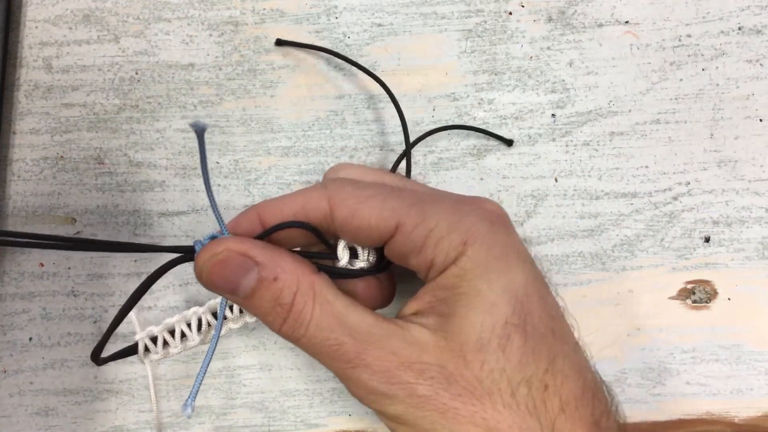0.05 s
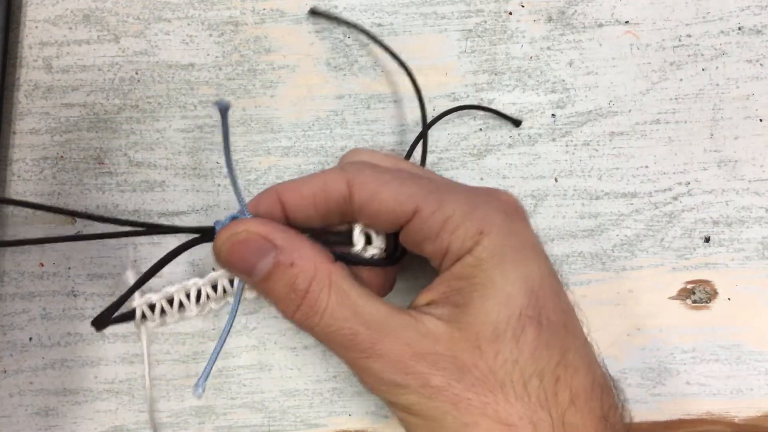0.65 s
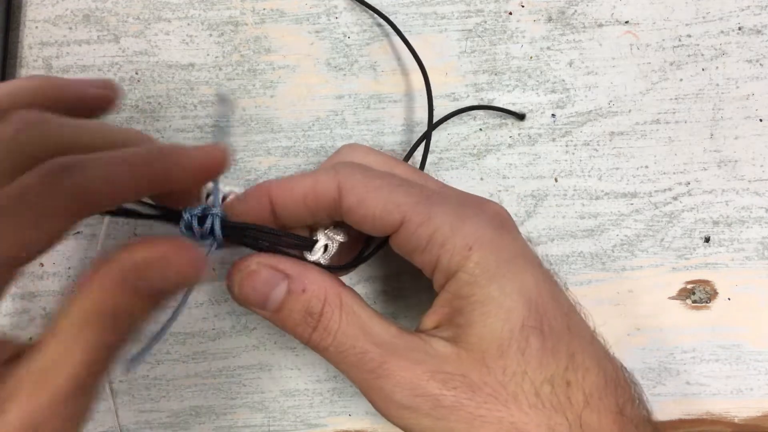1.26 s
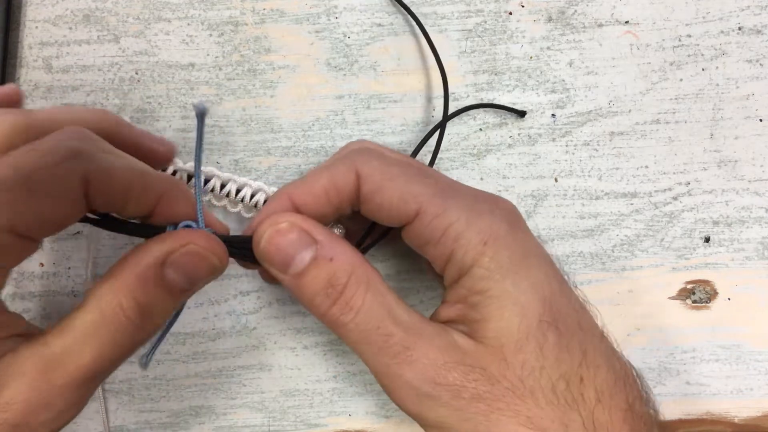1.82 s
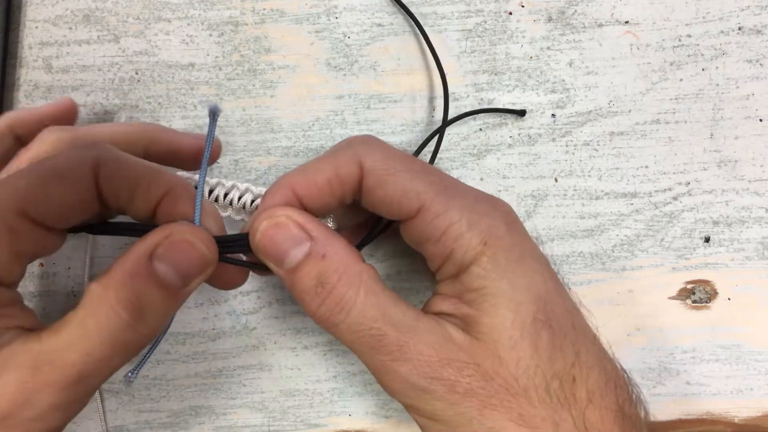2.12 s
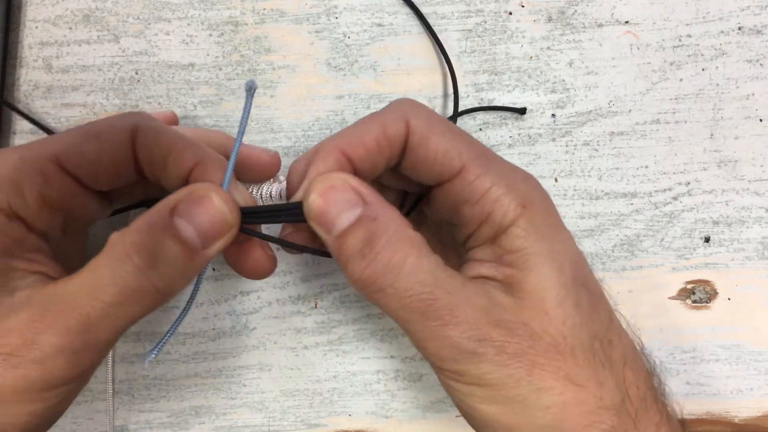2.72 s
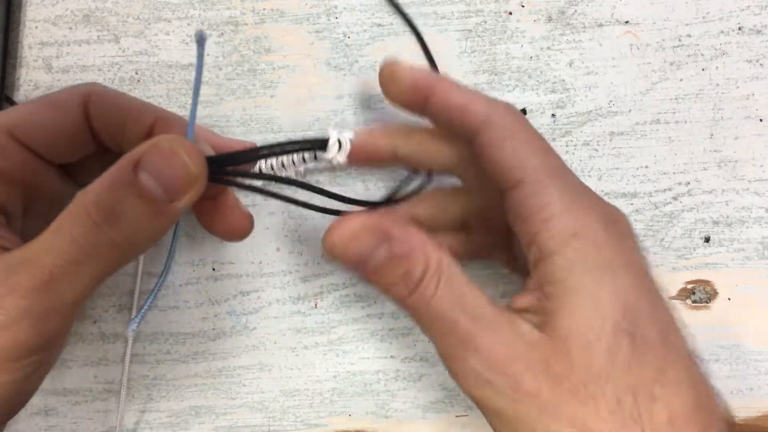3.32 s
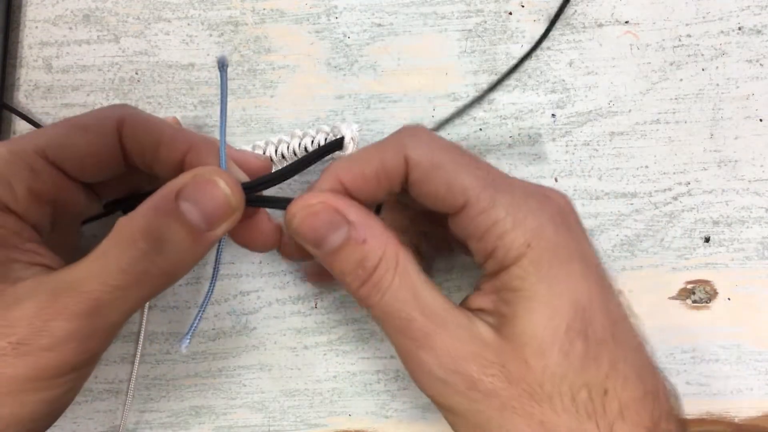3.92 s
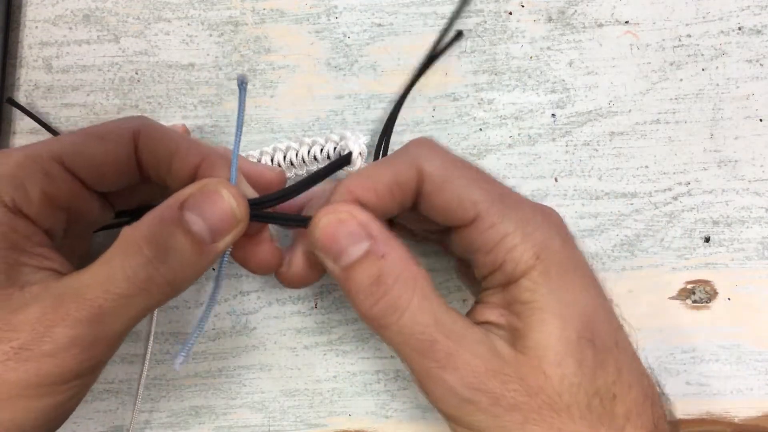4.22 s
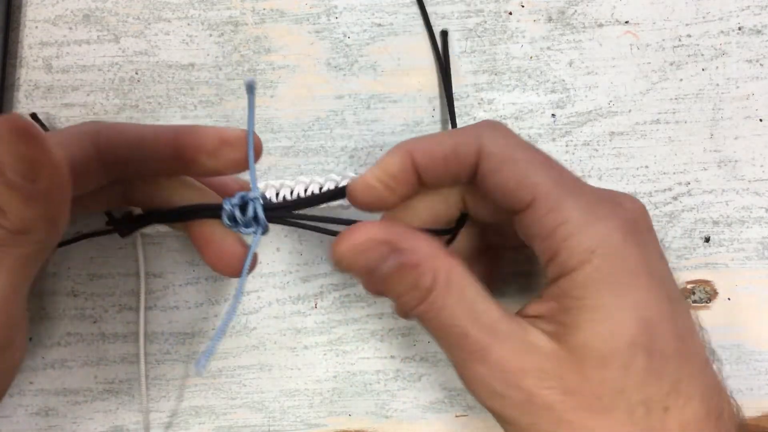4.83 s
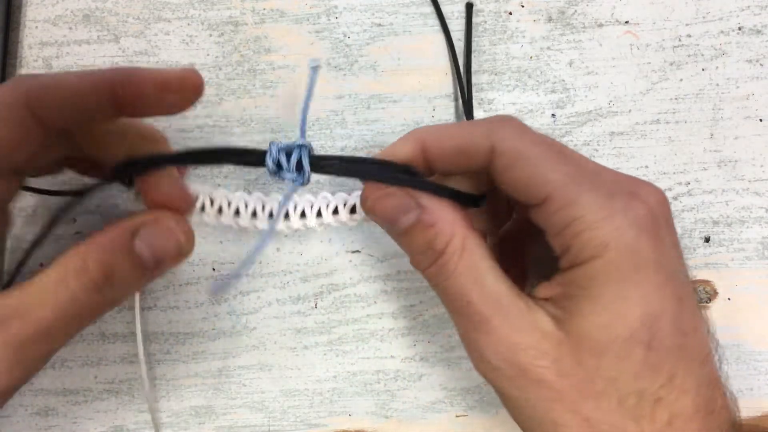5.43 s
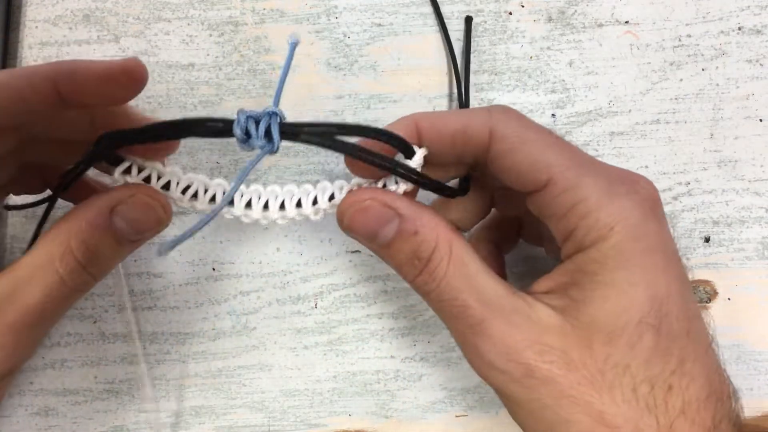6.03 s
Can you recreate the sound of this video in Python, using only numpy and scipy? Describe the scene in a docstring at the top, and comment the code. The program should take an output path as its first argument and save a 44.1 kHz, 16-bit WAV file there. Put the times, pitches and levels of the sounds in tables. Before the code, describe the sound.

Hands adjust the sliding knot of a braided nylon bracelet, heard close up in a small room. The cord gives a short zip, then its stiff ends tick lightly on a wooden table. Dull fingertip rubs and faint grainy swishes gather in the middle, followed by a second zip and a few more ticks. Tiny fibre snags are scattered throughout, all quiet over a steady low hum and thin hiss.

```python
"""A braided nylon cord rubs through the fingers as hands adjust a bracelet's sliding knot, close up.
Twice it zips, the ribs of its braid dragged over an edge. Fingertips grip with a dull rub, fibres snag
and snap free, and the stiff cord ends tick on a wooden table and set it ringing.
Under it all lies a bed of steady mains hum and the rumble and hiss of a small room."""
import sys
import numpy as np
from scipy import signal
from scipy.fft import rfft, irfft, next_fast_len
from scipy.io import wavfile

SR = 44100
rng = np.random.default_rng(int(sys.argv[2]) if len(sys.argv) > 2 else 0)


def dump_mix(stems):
    """Bounce the given channels to the path in sys.argv[1] as a 16-bit WAV at rate SR."""
    frames = np.atleast_2d(stems).T  # one column per channel
    limited = np.clip(frames, -1, 1)  # hard clip at full scale
    pcm = np.round(limited * 32767).astype(np.int16)
    wavfile.write(sys.argv[1], SR, pcm)


N = 267378


def gain_of(db):
    """Decibels to amplitude."""
    return 10 ** (np.asarray(db) / 20)


def unit_rms(x):
    """Scales to an rms of one."""
    return x / np.sqrt(np.mean(x ** 2) + 1e-20)


def add(mix, start_s, sound):
    """Lays a sound into the mix at its cue."""
    part = mix[max(round(start_s * SR), 0):][:len(sound)]
    part += sound[:len(part)]


def equalised(x, curve, tilt_db=0):
    """Shapes x with an EQ curve, a tilt per octave and a 24 dB per octave low cut, at an rms of one."""
    size = next_fast_len(len(x))
    octave = np.log2(np.fft.rfftfreq(size, 1 / SR) + 1)
    hz, db = np.transpose(curve)
    corners = np.log2(hz + 1)
    low_cut_db = 24 * np.maximum(corners[0] - octave, 0)
    shape = gain_of(np.interp(octave, corners, db + tilt_db * corners) - low_cut_db)
    return unit_rms(irfft(rfft(x, size) * shape, size)[:len(x)])


# EQ of the room's low rumble: (frequency [Hz], level [dB])
RUMBLE_EQ = [(25, -46), (40, -16), (48, -20), (63, -1.5), (78, -4), (102, 0), (114, -0.5), (142, 3),
             (158, -8), (225, -7), (300, -16), (400, -23), (520, -32.5), (900, -66.5)]
# EQ of the room's airy hiss: (frequency [Hz], level [dB])
HISS_EQ = [(480, -3.5), (680, 1.5), (900, -7.5), (1050, -7), (1240, -5.5), (1450, -12), (2100, -14.5),
           (3400, -20), (4600, -18), (7600, -25.5), (8500, -23.5), (11000, -23), (13300, -19.5),
           (15700, -22.5)]


def room_tone(hum_hz=120.3, hum_db=-47.5, rumble_db=-55, hiss_db=-73.5):
    """The bed: mains hum over low rumble and thin hiss."""
    t = np.arange(N) / SR
    hum = gain_of(hum_db) * np.sqrt(2) * np.sin(2 * np.pi * (hum_hz * t + rng.random()))
    rumble = gain_of(rumble_db) * equalised(rng.standard_normal(N), RUMBLE_EQ)
    hiss = gain_of(hiss_db) * equalised(rng.standard_normal(N), HISS_EQ)
    return hum + rumble + hiss


def room_reverb(x, t60=0.3, predelay_s=0.0027):
    """The short, soft tail of a small room."""
    t = np.arange(SR // 3) / SR
    tail = rng.standard_normal(len(t)) * gain_of(-60 * t / t60) * (t > predelay_s)
    return signal.fftconvolve(x, tail / np.linalg.norm(tail))[:N]


def cupped_hands(x, echoes=6):
    """Adds early reflections off the hands and the things around them."""
    response = np.zeros(SR // 50)
    response[rng.integers(SR // 1000, SR // 60, echoes)] = .17 * rng.choice([-1, 1], echoes)
    response[0] = 1
    return signal.fftconvolve(x, response / np.linalg.norm(response))[:N]


def table_echo(x, delay_s, gain):
    """The bounce off the table top comb-filters the sound; comes out at an rms of one."""
    hz = np.fft.rfftfreq(len(x), 1 / SR)
    comb = 1 + gain * np.exp(-2j * np.pi * hz * delay_s)
    return unit_rms(irfft(rfft(x) * comb, len(x)))


# EQ of rubbed nylon: (frequency [Hz], level [dB])
NYLON_EQ = [(500, -53), (900, -4), (1500, -3), (2050, 0), (2650, -2.5), (3300, -2), (4200, 1.5),
            (5200, -1.5), (5950, -1.5), (6600, -2), (7700, -9.5), (8400, -6), (12700, -6), (16000, -16)]


def nylon_scratch(count, centre_hz, focus_db):
    """Nylon-coloured noise, rolled off by focus_db at one octave either side of a centre."""
    curve = [(hz, db - focus_db * np.log2(hz / centre_hz) ** 2) for hz, db in NYLON_EQ]
    return equalised(rng.standard_normal(count), curve)


def faint_snag_cues(first_s=.2, last_s=5.5, per_s=1.5, db=-78.5, spread_db=3, centre_hz=6500):
    """Random cues for small fibres catching in the braid while the hands work."""
    span_s = last_s - first_s
    draws = rng.random((round(per_s * span_s), 2))
    return [(first_s + when * span_s, db + spread_db * (2 * size - 1), centre_hz) for when, size in draws]


# fibres catching and snapping free: (time [s], level [dB], tone centre [Hz])
SNAG_CUES = [(0.349, -66.5, 10300), (.882, -73.5, 10300), (1.088, -67, 8100), (1.732, -76, 6040),
             (2.164, -72.5, 11900), (2.63, -70.5, 7000), (4.103, -75, 6200), (5.131, -73, 6500)]


def fibre_snag(time_s, db, centre_hz, attack_s=0.00048, decay_s=0.0059):
    """A fibre lets go with a short, dry scratch."""
    t = np.arange(SR // 10) / SR
    envelope = (1 - np.exp(-t / attack_s)) * np.exp(-t / decay_s)
    scratch = nylon_scratch(len(t), centre_hz, focus_db=12)
    return time_s, gain_of(db) * envelope / envelope.max() * scratch


# modes of the wooden table top: (frequency [Hz])
WOOD_HZ = [754, 1281, 1658, 2222, 2946, 3560, 4037, 4552, 5089, 5550, 5920, 6850, 12800, 14200]
# how each of those modes rings: (level [dB], time to fall 60 dB [s])
WOOD_RING = [(-15, 0.082), (-10, 0.11), (-10, 0.086), (-15, 0.18), (-2, 0.038), (-9.5, 0.029), (-20, 0.14),
             (-16, 0.18), (-14, 0.051), (-7.5, 0.048), (-12, 0.038), (-3.5, 0.027), (-4.5, 0.03),
             (-11, 0.039)]


def through_wood(rub, share):
    """Where the cord touches the table, a share of the rub's power sounds through the wood's modes."""
    t = np.arange(SR // 3) / SR
    modes = sum(gain_of(db - 60 * t / t60) * np.sin(2 * np.pi * hz * t)
                for hz, (db, t60) in zip(WOOD_HZ, WOOD_RING))
    ring = signal.fftconvolve(rub, modes)[:len(rub)]
    return np.sqrt(1 - share) * rub + np.sqrt(share) * rub.std() * unit_rms(ring)


# stiff cord ends ticking on the table: (time [s], level [dB], tone centre [Hz])
TAP_CUES = [(1.0616, -67.5, 2500), (1.090, -62, 2980), (2.274, -69.5, 2900), (2.3355, -52, 5160),
            (4.665, -59.5, 2120), (5.343, -63.5, 3000), (5.4, -64.5, 2700), (5.5232, -63, 2030)]


def cord_end_tap(time_s, db, centre_hz, attack_s=0.0007, crack_decay_s=0.0088, knock_t60=0.11):
    """A cord end strikes the wood: a brief crack and a dull knock, then the table's modes die away."""
    t = np.arange(SR // 3) / SR
    ring = np.zeros(len(t))
    for hz, (mode_db, t60) in zip(WOOD_HZ, WOOD_RING):
        struck_db = mode_db - np.log2(hz / centre_hz) ** 2  # 1 dB down an octave off centre
        ring += gain_of(struck_db - 60 * t / t60) * np.sin(2 * np.pi * (hz * t + rng.random()))
    knock = gain_of(-60 * t / knock_t60) * np.sin(2 * np.pi * WOOD_HZ[0] * t)
    crack = np.exp(-t / crack_decay_s) * nylon_scratch(len(t), centre_hz, focus_db=8)
    layers = gain_of(-3) * ring + gain_of(-4.5) * crack + gain_of(-10.5) * knock
    return time_s, gain_of(db) * (1 - np.exp(-t / attack_s)) * layers


def friction(peak_s, length_s, db, curve, tilt_db, grain_db, flutter_db, flutter_hz):
    """A swarm of tiny slips of unequal size that swells and fades with the hand's speed."""
    t = np.arange(2 * SR) / SR - 1  # one second either side of the peak
    ramp_s = length_s * np.where(t < 0, .46, .54)  # the swell is a little quicker than the fade
    speed = np.exp(-(t / ramp_s) ** 2)
    slips = rng.standard_normal(len(t))
    slips *= gain_of(grain_db * np.minimum(rng.exponential(1, len(t)), 5))
    flutter = np.interp((t + 1) * flutter_hz, np.arange(1024), rng.standard_normal(1024))
    pressure = unit_rms(gain_of(flutter_db * flutter))
    rub = table_echo(equalised(slips, curve, tilt_db), delay_s=.00061, gain=.22)
    stroke = gain_of(db) * speed * pressure * rub
    return max(peak_s - 1, 0), stroke[peak_s + t >= 0]


# EQ of dragging skin: (frequency [Hz], level [dB])
SKIN_EQ = [(90, -14), (170, 5.5), (290, 0.5), (380, 6), (510, -16), (620, -3.5), (760, -6.5), (980, -18),
           (1270, -12), (1500, -23.5), (1750, -24.5), (3000, -37)]
# fingertips gripping the taut cord: (peak time [s], length [s], level [dB])
GRIP_CUES = [(1.348, .09, -66), (2.527, 0.08, -61), (2.692, 0.16, -62), (2.808, 0.098, -58.5),
             (2.912, 0.065, -58), (2.992, 0.11, -57), (3.183, 0.1, -67.5), (3.495, 0.06, -66.5),
             (3.911, 0.1, -63.5), (4.102, 0.054, -59.5), (4.168, 0.024, -60.5), (4.958, 0.045, -61)]


def finger_grip(peak_s, length_s, db):
    """Skin drags on the taut cord with a dull rub, and the squeezed braid rustles faintly."""
    start_s, skin = friction(peak_s, length_s, db, SKIN_EQ, tilt_db=0,
                             grain_db=2.5, flutter_db=1, flutter_hz=120)
    _, rustle = cord_slide(peak_s, length_s, db - 20, tilt_db=0)
    return start_s, skin + rustle


# cord sliding between the fingers or along the table:
# (peak time [s], length [s], level [dB], brightness [dB/octave], share through the wood [0-1])
SLIDE_CUES = [ (0.536, .016, -68, 10, 0), (1.121, 0.18, -78, -2.5, .4), (1.328, 0.12, -78.5, -3.5, 0.05),
              (2.318, 0.068, -73, 3.5, 0.8), (2.409, 0.075, -75, 4.5, 0.3), (2.547, 0.11, -71, 0, 0.17),
              (2.679, 0.1, -70, 3, 0.06), (3.18, 0.068, -64, 2.5, 0), (3.232, 0.097, -70, -1.5, 0),
              (3.371, 0.16, -69.5, 1, 0), (3.512, 0.2, -74, -6.5, 0), (3.966, 0.43, -77, -5.5, 0),
              (4.604, 0.14, -72, -0.5, 0.04), (4.669, 0.096, -76, 0, 0.1), (4.901, 1, -81, -2.5, 0),
              (5.344, 0.08, -73, -1.5, 0.1), (5.408, 0.14, -78, -2, 0.14), ]


def cord_slide(peak_s, length_s, db, tilt_db):
    """Nylon runs over skin, wood or itself with a grainy swish."""
    return friction(peak_s, length_s, db, NYLON_EQ, tilt_db, grain_db=3, flutter_db=3.5, flutter_hz=260)


# EQ of one rib's scrape: (frequency [Hz], level [dB])
RIB_EQ = [(1000, -26), (2300, -15), (3000, -5), (4000, -7), (5200, -4), (7000, -6), (7900, -10), (8800, -4),
          (9600, 1), (11000, -1), (12000, 1), (13500, -3), (14800, -3), (16000, -8)]
# the braid dragged over an edge: (start [s], peak time [s], end [s], top speed [ribs/s],
# level at top speed [dB], brightness [dB/octave], table echo delay [s])
ZIP_CUES = [(.545, .603, .620, 278, -58, 3.4, .000494), (4.277, 4.3228, 4.364, 172, -60.4, -.4, .000394)]


def braid_zip(start_s, peak_s, end_s, top_speed, db, tilt_db, echo_s, stick_speed=70, puff_s=.0012):
    """Each rib scrapes over the edge in a puff; the puffs crowd and swell, then slow until it sticks."""
    t = np.arange(start_s, end_s, 1 / SR)
    stick_octaves = np.log2(stick_speed / top_speed)
    octaves = np.interp(t, [start_s, peak_s, end_s], [stick_octaves, 0, stick_octaves])
    speed = top_speed * 2 ** octaves
    ribs = np.cumsum(speed) / SR
    ribs -= np.interp(peak_s, t, ribs)  # one rib lands right on the peak
    from_rib_s = abs((ribs + .5) % 1 - .5) / speed
    puffs = unit_rms(.11 + 1 / (1 + (from_rib_s / puff_s) ** 2))  # a little scrape stays between ribs
    scrape = table_echo(equalised(rng.standard_normal(len(t)), RIB_EQ, tilt_db), echo_s, gain=.25)
    swell = gain_of(db + 4.5 * octaves)  # 4.5 dB louder with each doubling of speed
    return start_s, swell * puffs * scrape


def scene():
    """The mono mix: close handling, a touch of reverb and the room bed."""
    rubbing = np.zeros(N)
    for *cue, wood_share in SLIDE_CUES:
        start_s, rub = cord_slide(*cue)
        add(rubbing, start_s, through_wood(rub, wood_share))
    for cue in GRIP_CUES:
        add(rubbing, *finger_grip(*cue))
    handling = cupped_hands(rubbing)
    for cue in ZIP_CUES:
        add(handling, *braid_zip(*cue))
    for cue in TAP_CUES:
        add(handling, *cord_end_tap(*cue))
    for cue in SNAG_CUES + faint_snag_cues():
        add(handling, *fibre_snag(*cue))
    return (handling + gain_of(-17) * room_reverb(handling) + room_tone())[None]


def record(dry):
    """A steep high cut takes off the very top."""
    high_cut = signal.firwin(801, cutoff=15760, window=("kaiser", 9), fs=SR)
    return signal.oaconvolve(dry, high_cut[None], "same")


dry = scene()
out = record(dry)
dump_mix(out)
```